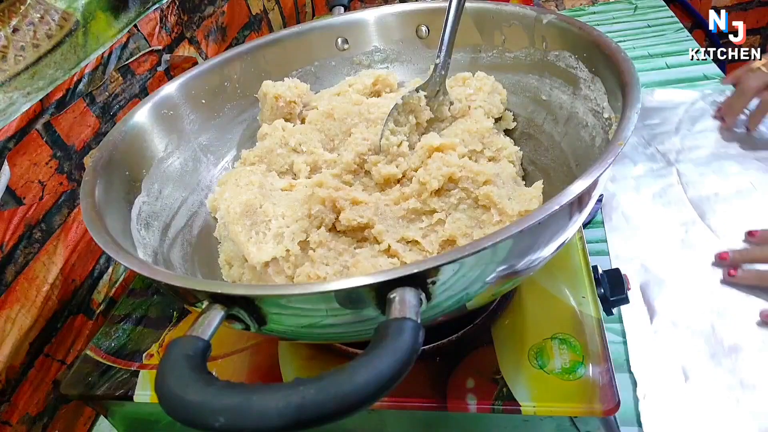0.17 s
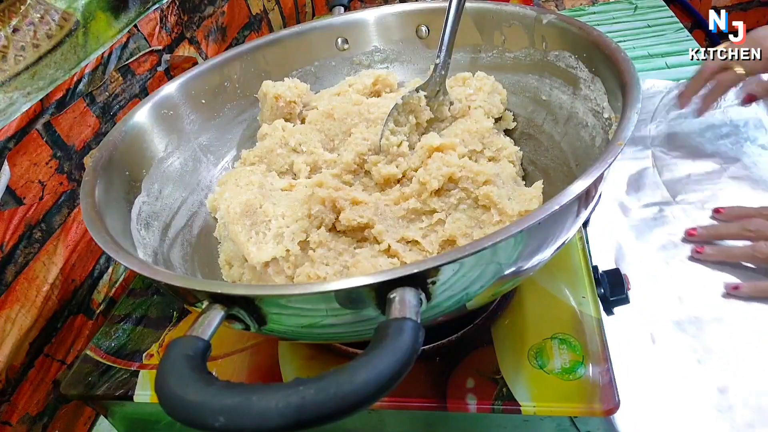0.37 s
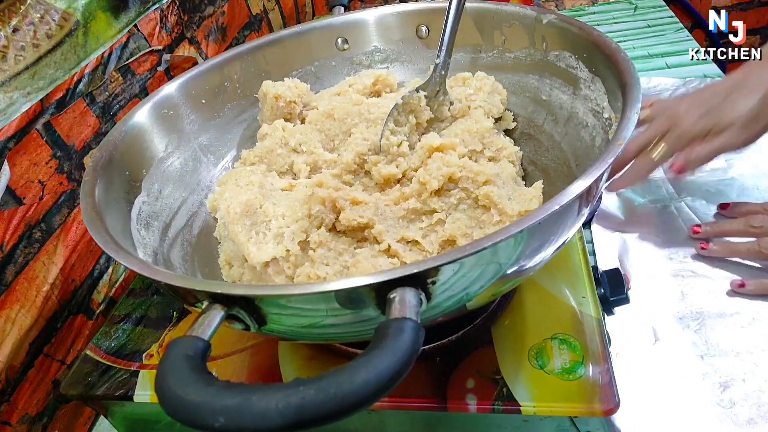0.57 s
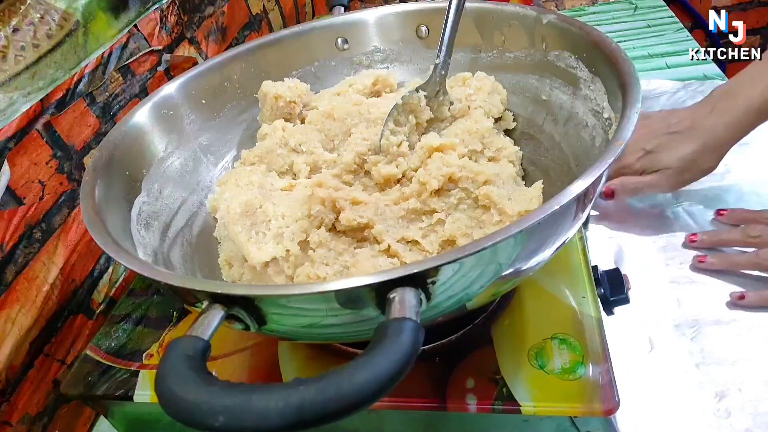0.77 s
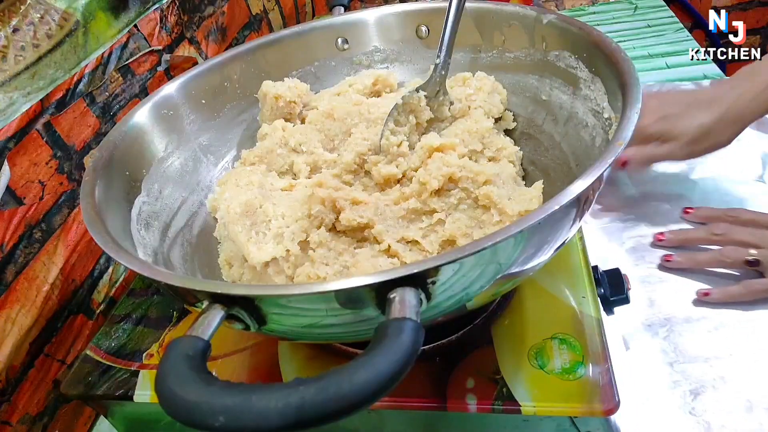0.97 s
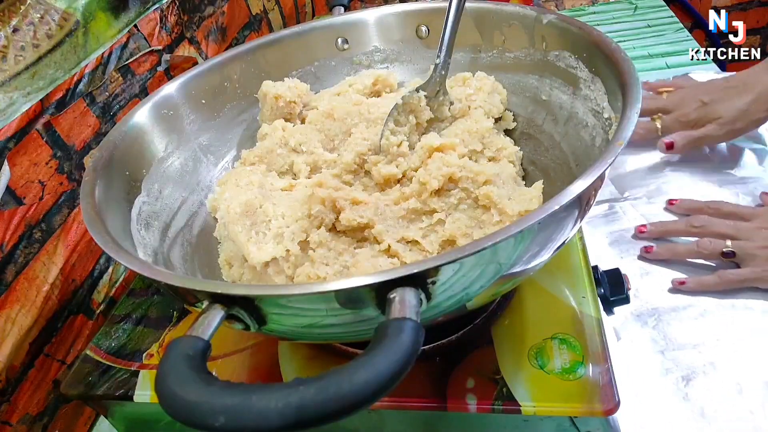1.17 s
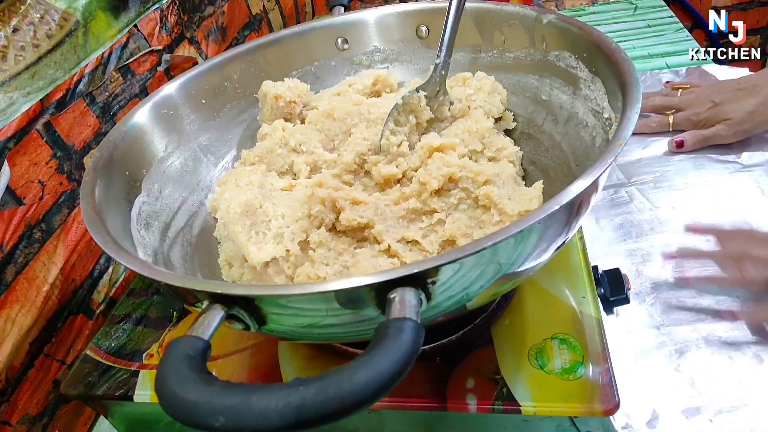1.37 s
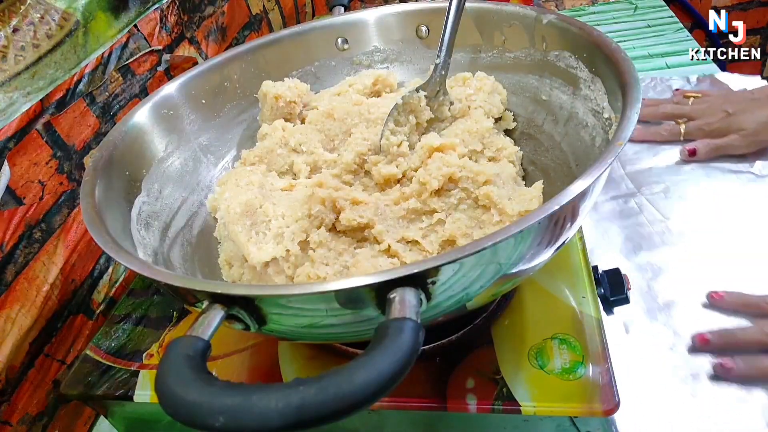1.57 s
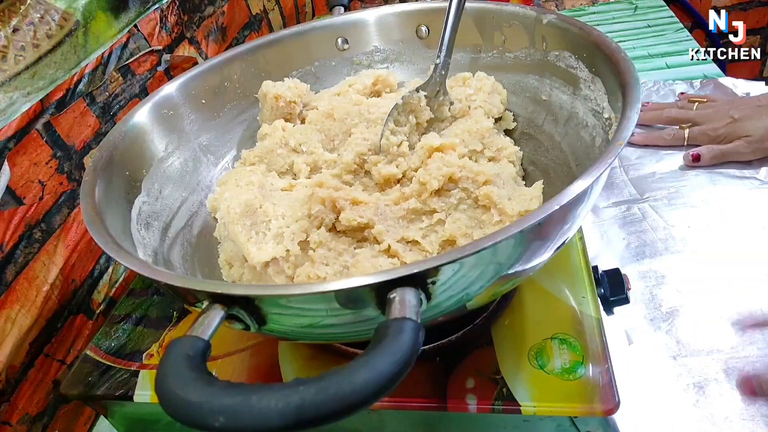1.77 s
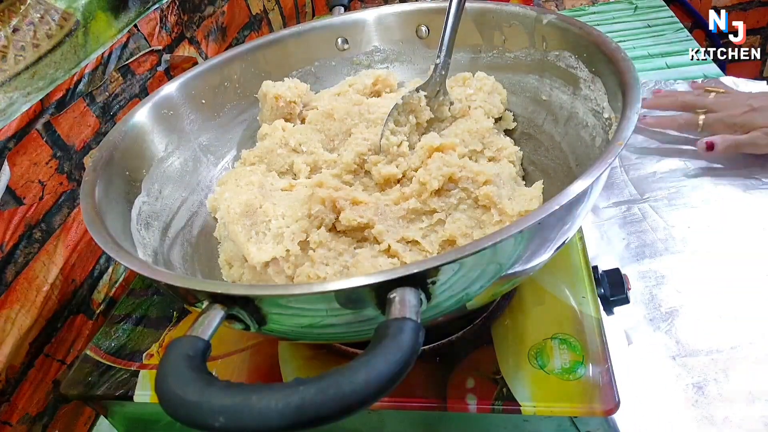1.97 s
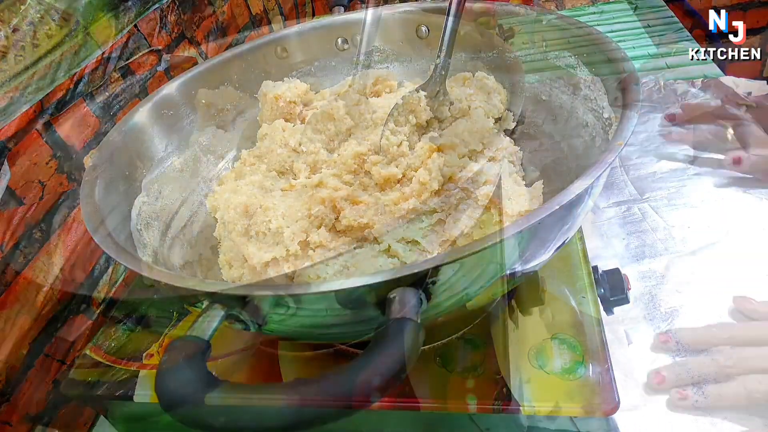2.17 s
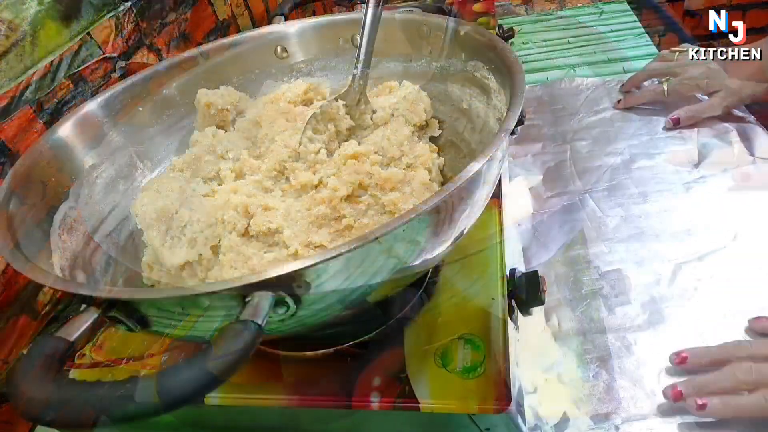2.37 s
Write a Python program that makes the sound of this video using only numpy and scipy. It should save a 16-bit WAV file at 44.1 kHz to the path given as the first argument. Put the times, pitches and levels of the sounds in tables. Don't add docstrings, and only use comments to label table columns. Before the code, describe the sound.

Crisp foil rustling in bursts under sliding palms, with soft table thumps, fading to small crackles.

```python
import sys
import numpy as np
from scipy import signal
from scipy.fft import rfft, irfft
from scipy.io import wavfile
from scipy.ndimage import map_coordinates

SR = 44100
rng = np.random.default_rng(int(sys.argv[2]) if len(sys.argv) > 2 else 0)


def unload_wav(signal):
    wavfile.write(
        sys.argv[1],
        SR,
        np.round(np.clip(np.atleast_2d(signal).T, -1, 1) * 32767).astype(np.int16),
    )


def boost(x):
    u = np.asarray(x, float) / 20
    return 10 ** u


N = 106369
LEFT_RIGHT = np.array([[1], [-1]])


def rms_one(x):
    return x / np.sqrt(np.mean(x ** 2) + 1e-20)


def at_hz(points, hz):
    points_hz, values = np.transpose(points)
    return np.interp(np.log(hz), np.log(points_hz), values)


def drift(rate_hz):
    r = np.exp(-2 * np.pi * rate_hz * 20 / SR)
    slow = signal.lfilter([1], [1, -2 * r, r * r], rng.standard_normal(N // 20 + 1002))[1000:]
    return np.interp(np.arange(N) / 20, np.arange(len(slow)), rms_one(slow))


def band(x, low_hz, high_hz):
    edges_hz = [low_hz, min(high_hz, 0.45 * SR)]
    return signal.sosfilt(signal.butter(2, edges_hz, "band", fs=SR, output="sos"), x)


def ring(clicks, hz, t60):
    r, w = boost(-60 / (t60 * SR)), 2 * np.pi * hz / SR
    return signal.lfilter([0, np.sin(w)], [1, -2 * r * np.cos(w), r * r], clicks + 1e-18)


def pair(three, share):
    lag_s = 0.0003007
    share = np.clip(share, 0, 1)
    late = map_coordinates(three[0], [np.arange(N) - lag_s * SR], order=3)
    return np.sqrt(share) * np.array([three[0], late]) + np.sqrt(1 - share) * three[1:]


def air():
    # f/Hz, level/dB
    spectrum = [(12, -32), (20, 0.5), (49, 0), (177, -2.5), (347, -16), (1530, -19.5), (5850, -24),
                (10500, -35), (16000, -33)]
    # f/Hz, likeness (-1 to 1)
    likeness = [(60, 1), (130, 0.96), (290, 0.65), (640, 0.18), (1400, -0.51), (3000, 0.17)]
    level_db = -47
    edges = 18 * 2 ** np.arange(0, 10.2, 0.5)
    white = rng.standard_normal((2, 2, N + SR // 2))
    out = 0
    for k, (low, high) in enumerate(zip(edges, edges[1:])):
        hz = np.sqrt(low * high)
        mid, side = band(white[k % 2], low, high)[:, SR // 2:]
        alike = np.clip(at_hz(likeness, hz), -1, 1)
        stereo = np.sqrt(1 + alike) * mid + np.sqrt(1 - alike) * side * LEFT_RIGHT
        out = out + boost(at_hz(spectrum, hz)) * stereo
    return boost(level_db) * rms_one(out)


def room(x, seconds):
    t = np.arange(int(seconds * SR)) / SR
    tail = rng.standard_normal((2, len(t))) * boost(-60 * t / seconds) * np.minimum(t / 0.0066, 1)
    tail = tail / np.sqrt(np.sum(tail ** 2, axis=1, keepdims=True))
    return signal.fftconvolve(x, tail, axes=1)[:, :N]


def shake():
    # t/s, level/dB
    strength = [(0, -21.5), (.1, -32), (.4, -40.5), (.6, -47.5), (1.0, -38.5), (1.15, -38.5), (1.4, -48),
                (2.41, -49.5)]
    # low f/Hz, high f/Hz, level/dB
    sways = [
        (19.5, 31, -4),
        (64.3, 77.1, -3.5),
        (113, 201, -8),
    ]
    white = rng.standard_normal((2, N + SR))
    mid, side = sum(boost(db) * rms_one(band(white, low, high)[:, SR:]) for low, high, db in sways)
    level_db = np.interp(np.arange(N) / SR, *np.transpose(strength))
    return boost(level_db) * (mid + 0.15 * side * LEFT_RIGHT)


def brushes():
    # t/s, length/s, level/dB
    strokes = [
        (0.035, 0.073, -40.5),
        (0.185, 0.22, -43.5),
        (0.672, 0.16, -52.5),
        (0.997, 0.057, -39.5),
        (1.118, 0.064, -46),
        (1.245, 0.031, -49.5),
        (1.914, 0.054, -46),
    ]
    low_hz, high_hz, rise_s, release_s = 270, 1400, 0.0027, 0.022
    t, shape = np.arange(N) / SR, 0
    for start, length, db in strokes:
        rise = np.clip((t - start) / rise_s, 0, 1)
        release = np.exp(-np.maximum(t - start - length, 0) / release_s)
        shape = shape + boost(db) * rise * release
    return shape * rms_one(band(pair(rng.standard_normal((3, N)), 0.62), low_hz, high_hz))


def knocks():
    # t/s, level/dB, deep boom level/dB, contact cut f/Hz, share of the free ring time
    hits = [
        (.0002, -16, -9, 328, 0.92),
        (.04, -33, 4.5, 444, 0.73),
        (0.7988, -22.5, -33, 1760, 0.33),
        (0.8009, -19.5, -37, 1520, 0.38),
        (0.851, -28, -30, 700, 0.5),
        (.94, -36.5, -22, 730, 0.71),
        (1.021, -34.5, -5, 1500, .45),
        (1.111, -43.5, 7.5, 920, .6),
        (1.15, -43, -6, 1500, 0.21),
        (1.269, -39.5, -8, 900, 0.23),
    ]
    # f/Hz, level/dB, t60/s
    modes = [(224, -12, 0.39), (307.7, 4.5, 0.41), (322.2, -1, 0.16), (326.6, -3.5, 0.24),
             (388.3, -8, 0.24), (545, -8, 0.16), (601.3, -13, 0.34), (834, -27, .2), (890, -24, 0.043),
             (1130, -27, 0.088), (1210, -12, .1), (1720, -26, .05)]
    deep_hz, deep_t60_s, top_low_hz = 74.4, 0.267, 265
    thud_db, thud_t60_s, thud_low_hz, thud_high_hz = -12, 0.2, 269, 1110
    luck_db, side_spread_db = 1.5, 0.6
    t, out = np.arange(N) / SR, np.zeros((2, N))
    noise = rng.standard_normal((3, N))
    white = noise[0] + 0.54 * noise[1:]
    luck = rng.normal(0, 1, (len(hits), len(modes), 2))
    for (start, db, deep_db, cut_hz, free), draw in zip(hits, luck):
        click = np.zeros(N)
        click[int(start * SR)] = boost(db)
        r = np.exp(-2 * np.pi * cut_hz / SR)
        soft = signal.lfilter([(1 - r) ** 2], [1, -2 * r, r * r], click + 1e-18)
        stiff = band(soft, top_low_hz, 8000)
        fade = (t > start) * boost(db + thud_db - 60 * np.maximum(t - start, 0) / thud_t60_s)
        out += fade * rms_one(band(white, thud_low_hz, min(thud_high_hz, cut_hz * 1.46)))
        out += boost(deep_db) * ring(soft, deep_hz, deep_t60_s)
        for k, ((hz, mode_db, t60), (both, side)) in enumerate(zip(modes, draw)):
            level_db = mode_db + luck_db * both + side_spread_db * side * LEFT_RIGHT
            out += (-1) ** k * boost(level_db) * ring(stiff, hz, t60 * free)
    right = pair(out[[1, 0, 1]], 0.93)[1]
    return np.array([out[0], right])


def foil_crackles():
    per_s, size_spread_db, clump_db, clump_hz, shared = 11000, 1.5, 1.03, 138, 0.18
    sizes = boost(size_spread_db * np.minimum(rng.exponential(1, (2, 3, N)), 5))
    sizes = sizes * rng.choice([-1, 1], (2, 3, N))
    snaps = rng.random((2, 3, N)) < per_s / SR
    crackles = sizes * snaps * boost(clump_db * drift(clump_hz))
    return [pair(c, shared) for c in crackles]


def foil():
    # t/s, level/dB, tilt/(dB per octave), left over right/dB
    slide = [(0, -32, -1.5, 2.5), (.16, -33, -1.6, 1.5), (.28, -23, 0.16, 2), (.46, -30, 0.4, 0.7),
             (.52, -44, -1.5, .6), (.61, -52, -4, 1.5), (.74, -52.5, -4.5, 1), (.82, -41.5, 1.7, 3),
             (.93, -36, -1.4, .6), (.99, -36.5, 3.3, 3.5), (1.15, -30.5, -3, .1), (1.25, -37.5, -1.5, 1.5),
             (1.38, -44.5, -4, -.6), (1.49, -58.5, -7, 2), (1.56, -36.5, -0.5, 2), (1.99, -58.5, -6.5, 0.5),
             (2.12, -44.5, 0.7, 2.5), (2.26, -53.5, 3, 5.5)]
    # t/s, level/dB, rise/s, t60/s, tilt/(dB per octave)
    pats = [(.005, -24, 0.014, 0.83, 3.5), (0.176, -25, .03, 0.72, 1), (.64, -44.5, 0.025, 0.48, -0.5),
            (0.758, -45.5, 0.0032, 0.37, 7.5), (.875, -35, 0.0089, 0.56, 1.5), (1.003, -30, 0.015, 0.12, 4),
            (1.055, -30.5, 0.009, 0.28, 3), (1.258, -19.5, .014, 0.41, 1.8), (1.355, -31, 0.05, 0.22, 1),
            (1.536, -23.5, .02, 0.34, 3), (1.77, -40, 0.0079, 0.083, 8.5), (1.898, -48, 0.0022, 0.2, 1.5),
            (2.013, -34, 0.0094, 0.34, 2.5), (2.28, -49, 0.0079, 0.45, 10.5), (2.265, -51, .005, .3, -5),
            (2.306, -36, 0.057, 0.68, -4)]
    # f/Hz, density level/(dB per Hz)
    colour = [(400, -21), (1000, -16.5), (1900, -16.5), (3000, -9.5), (5000, -6.5), (8000, -10),
              (12000, -16.5), (16000, -27)]
    pat_knee_hz, pat_low_loss_db = 3220, 5.5
    top_fade_db_per_s = 60
    pivot_hz, patch_db, patch_hz = 6000, 1.2, 30
    t, out = np.arange(N) / SR, 0
    slide_t, *slide_values = np.transpose(slide)
    slide_db, slide_tilt, pan_db = (np.interp(t, slide_t, values) for values in slide_values)
    shapes = []
    for start, db, rise, t60, _ in pats:
        decay_db = 60 * np.maximum(t - start - rise, 0) / t60
        shapes.append(np.sqrt(np.clip((t - start) / rise, 0, 1)) * boost(db - decay_db))
    trains = foil_crackles()
    edges = 400 * 2 ** (np.arange(18) / 3)
    bands = list(zip(edges, edges[1:]))
    total = np.sqrt(sum(boost(2 * at_hz(colour, np.sqrt(a * b))) * (b - a) for a, b in bands))
    for k, (low, high) in enumerate(bands):
        hz = np.sqrt(low * high)
        octaves = np.log2(hz / pivot_hz)
        thin_db = pat_low_loss_db * max(np.log2(pat_knee_hz / hz), 0)
        power = boost(2 * (slide_db + slide_tilt * octaves))
        for i, (start, _, rise, _, tilt) in enumerate(pats):
            if octaves > 0:
                shapes[i] = shapes[i] * boost(-top_fade_db_per_s / 3 * np.maximum(t - start - rise, 0))
            power = power + (shapes[i] * boost(tilt * octaves - thin_db)) ** 2
        patchy_db = at_hz(colour, hz) + patch_db * drift(patch_hz)
        gain = np.sqrt(power * (high - low)) * boost(patchy_db) / total
        out = out + gain * rms_one(band(trains[k % 2], low, high))
    return out * boost(pan_db / 2 * LEFT_RIGHT)


def scene():
    near = foil() + knocks() + brushes()
    echo = boost(-14) * room(band(near, 200, SR), 0.16)
    return near + echo + shake() + air()


def top_cut(x):
    return signal.sosfilt(signal.butter(12, 16280, fs=SR, output="sos"), x)


def record(dry):
    # f/Hz, level/dB
    presence = [(4600, 0), (5300, 3.5), (5900, 5.5), (6500, 4.5), (7300, 5), (7900, 0.7), (10000, 1.36),
                (11500, 1.5)]
    cutoff_hz = 15880
    hz = np.maximum(np.arange(N // 2 + 1) * SR / N, 1)
    heard = irfft(rfft(dry) * boost(at_hz(presence, hz)) * (hz < cutoff_hz), N)
    return top_cut(heard)


dry = scene()
out = record(dry)
unload_wav(out)
```